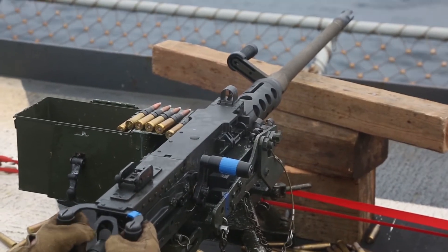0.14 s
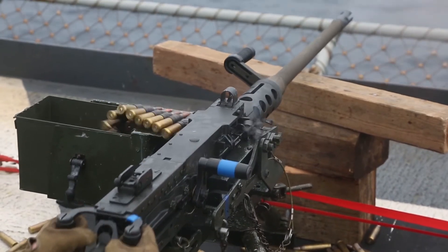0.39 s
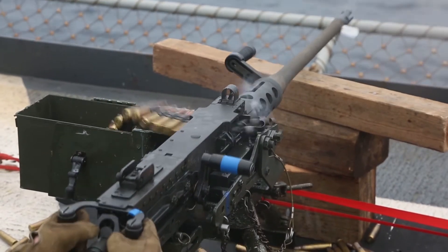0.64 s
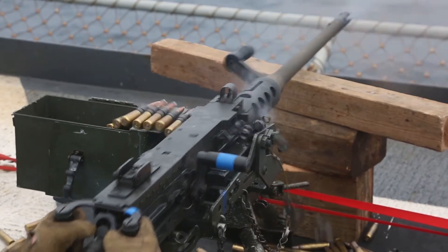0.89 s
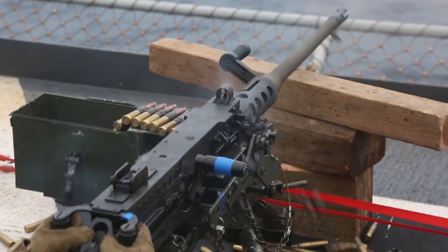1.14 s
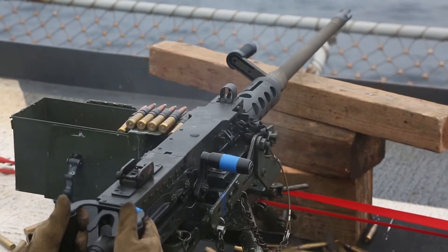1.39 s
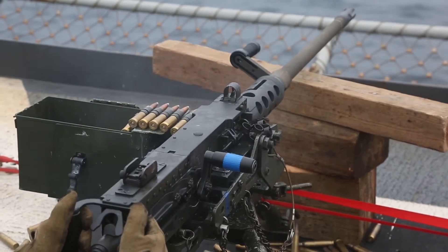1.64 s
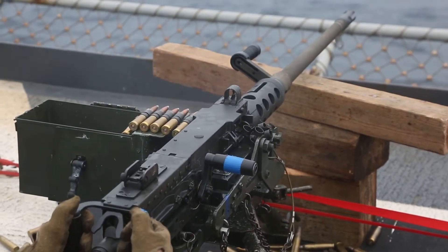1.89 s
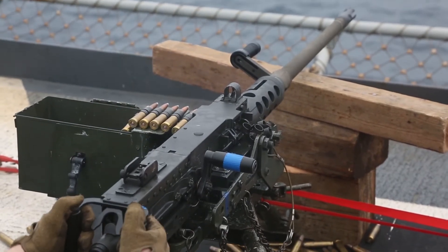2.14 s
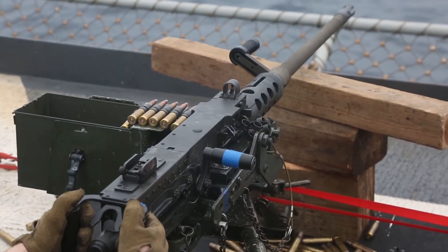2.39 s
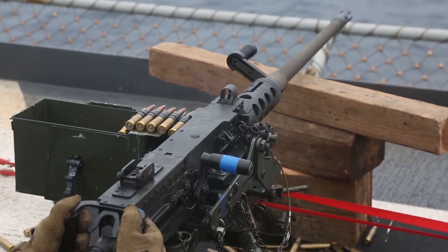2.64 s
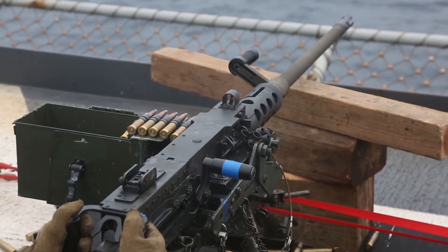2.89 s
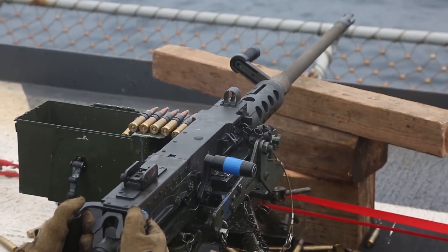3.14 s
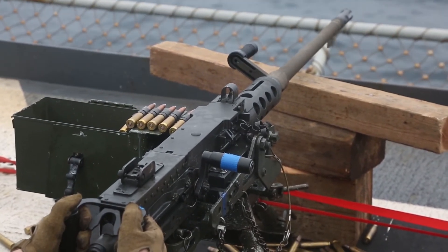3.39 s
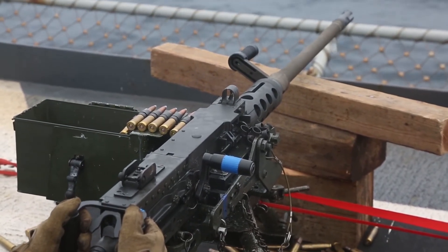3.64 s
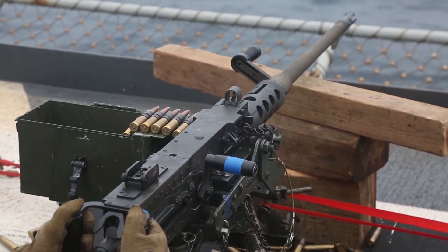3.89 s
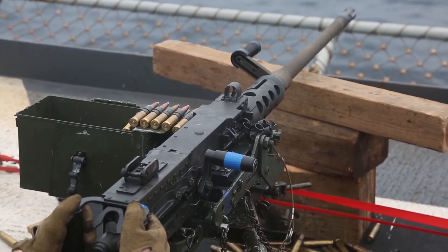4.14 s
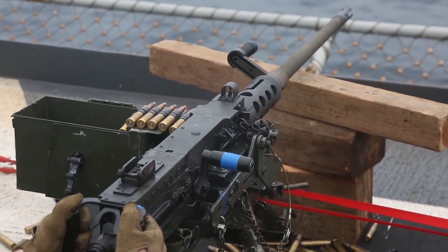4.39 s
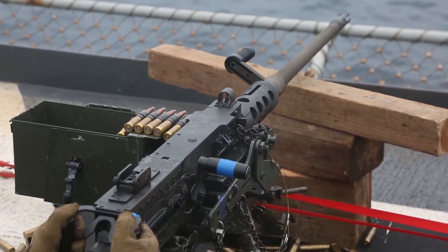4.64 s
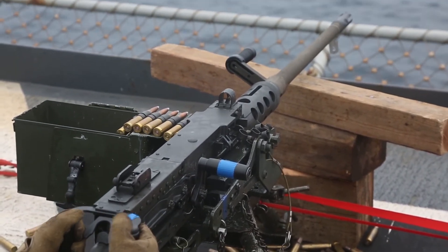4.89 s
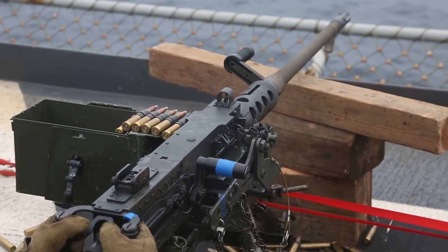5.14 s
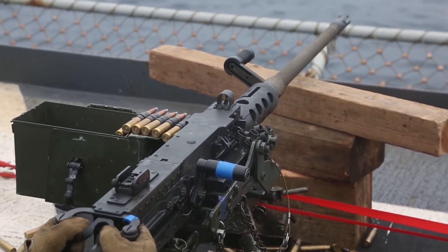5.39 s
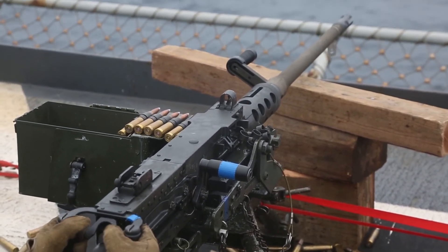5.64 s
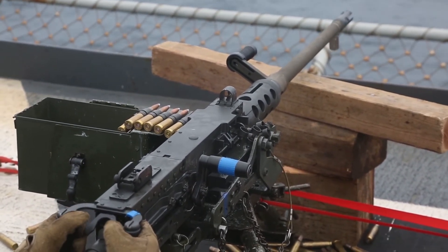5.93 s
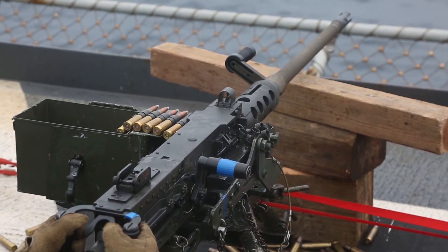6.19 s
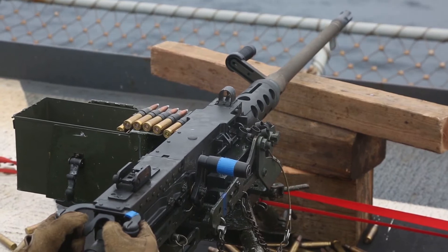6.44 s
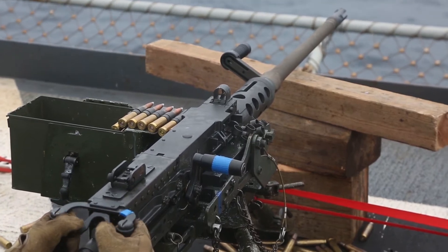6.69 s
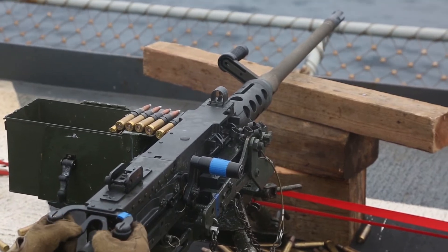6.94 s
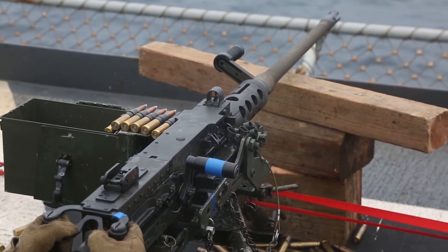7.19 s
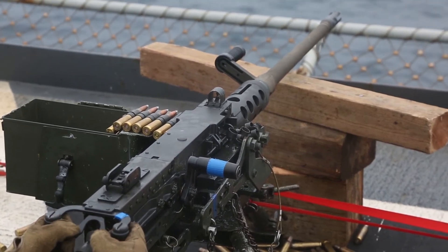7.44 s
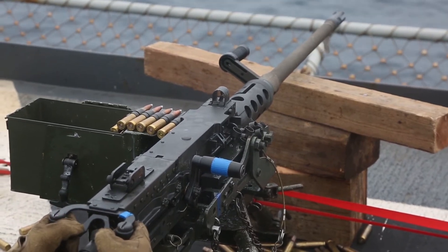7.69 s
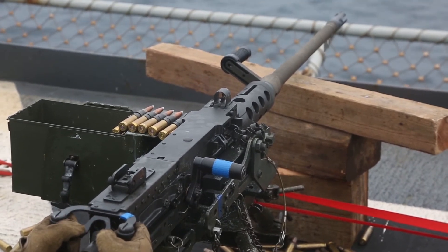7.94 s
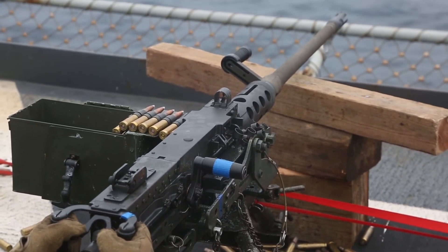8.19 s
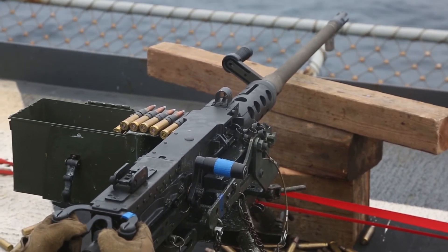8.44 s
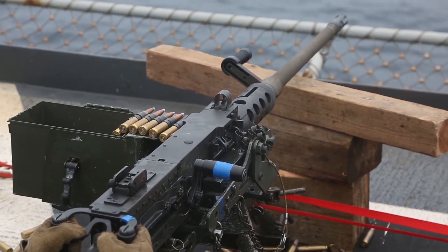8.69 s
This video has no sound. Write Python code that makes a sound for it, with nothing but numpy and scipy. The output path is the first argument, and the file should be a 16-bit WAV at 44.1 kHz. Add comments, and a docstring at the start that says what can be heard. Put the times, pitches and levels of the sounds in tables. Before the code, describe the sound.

A close heavy machine gun hammers a distorted nine-shot burst, brass clinks and echoes roll over water, then a second gun fires a longer burst.

```python
"""Two heavy machine guns on a ship's deck over open water: the near one fires a burst, later a neighbour does.
Each shot is shaped noise: a scattered blast, fresh muzzle gas and a long dull echo that overload the microphone.
Spent cases, bolt, mount and gear ring as dying sines and noise bursts; dull thumps are soft pressure pushes.
Underneath lie ship machinery hum as wavering sines, sea wash as swelling noise bands and lumpy low wind."""
import sys
import numpy as np
from scipy import signal
from scipy.io import wavfile
from scipy.ndimage import uniform_filter1d

SR = 44100
rng = np.random.default_rng(int(sys.argv[2]) if len(sys.argv) > 2 else 0)


def natural_amplitude(level_db):
    """Convert a level in decibels to a linear amplitude factor, elementwise."""
    exponent = np.asarray(level_db, float) / 20
    return 10 ** exponent


def inscribe(sig):
    """Save sig as 16-bit PCM at rate SR to the path in sys.argv[1].

    A 1-D sig is mono; a 2-D sig holds one channel per row.
    Samples are clipped to [-1, 1] before scaling.
    """
    pcm = np.round(np.clip(np.atleast_2d(sig).T, -1, 1) * 32767)
    wavfile.write(sys.argv[1], SR, pcm.astype(np.int16))


N = 388521

# Shots of the near gun; the first three fall before the start, so only their tails are heard.
# Each row: start in seconds, relative strength in dB.
NEAR_SHOTS = [(-0.69, -0.5), (-2.2, -1), (-1.08, 0), (.342, 0.5), (.447, 2), (.551, -2), (.66, -1),
              (.773, -0.5), (.88, -2), (.984, -0.5), (1.092, -0.5), (1.203, 0)]
# Shots of the neighbouring gun. Each row: start in seconds, relative strength in dB.
FAR_SHOTS = [(6.8983, -1.5), (7.0141, -2.5), (7.148, 0.5), (7.2714, 0), (7.404, -3), (7.534, 0),
             (7.6677, -1), (7.7956, -2), (7.9217, -0.5), (8.0504, -0.5), (8.1749, -1.5), (8.3099, 0.5),
             (8.4314, -0.5), (8.5604, 0.5)]
# Blast scattered by deck and ship, per gun.
# Each row: frequency in Hz, relative level in dB, build-up in seconds, 60 dB decay time in seconds.
NEAR_BLAST = [(60, -6, 0.028, 0.44), (170, 4.5, 0.04, 0.72), (348, 9.5, 0.017, 0.52),
              (800, 13, 0.0092, 0.42), (2009, 13, .006, 0.32), (5000, 7.5, 0.0048, 0.39),
              (12000, 14, .003, 0.084)]
FAR_BLAST = [(57, -10.5, 0.0072, 0.5), (150.6, 6, 0.029, .45), (320, 13, 0.0091, 0.37),
             (800, 12, 0.012, 0.35), (2040, 7.5, 0.0021, 0.31), (5000, 7, 0.0013, 0.3),
             (12350, 10, 0.0045, 0.13)]
# Resonances of the space around each gun. Each row: frequency in Hz, width in Hz, boost over the blast in dB.
NEAR_RESONANCES = [(204, 81, 3.5), (300, 12, 4), (371, 38, 5), (476, 25, 3), (624, 12, 2), (716, 110, 4),
                   (877, 41, 0.5), (1340, 48, 4), (2390, 68, 1.5)]
FAR_RESONANCES = [(283, 120, 2.4), (375, 17, 4.3), (402, 13, 2.1), (493, 15, 6.1), (620, 13, 4.3),
                  (702, 14, 2.4), (816, 18, 7.2), (980, 43, 3), (1130, 39, 6), (1580, 44, 4),
                  (1840, 250, 4.5)]
# Echo rolling back from hull and waves. Each row: frequency in Hz, early relative level in dB,
# early 60 dB decay time in seconds, late relative level in dB, late 60 dB decay time in seconds.
ECHO = [(60, -35, 0.9, -50.5, 5.9), (162.3, -19, 1.6, -34.5, 6.5), (400, -16.5, 1.6, -35, 6.2),
        (996, -24.5, 1.5, -26.5, 4.6), (2040, -15, 1.43, -26.5, 3.8), (3300, -25, 1.7, -48.5, 2.9),
        (5500, -24.5, 1.7, -61, 2.4), (12000, -43, 0.65, -84, 1.4)]
# Longest rings of the mount and the pile of brass, set going by the near gun.
# Each row: nominal frequency in Hz, relative level in dB, nominal 60 dB decay time in seconds.
MOUNT_MODES = [(3760, -30, 3.9), (5740, -34, 3.0), (7040, -40.5, 2.3), (7636, -40.5, 1.8), (8048, -48, 2),
               (8790, -37.5, 1.3), (10900, -44, 1.4)]
# Machinery lines. Each row: frequency in Hz, rms level in dB before wavering.
HUM_LINES = [(120, -68), (180, -50.5), (225, -67), (270, -60.5), (285, -63.5), (360, -68), (375, -61.5),
             (585, -63), (600, -72.5), (720, -65.5), (810, -71)]
# Spectrum of the sea wash. Each row: frequency in Hz, relative density in dB per Hz.
WASH_SPECTRUM = [(35, -46), (60, -14.5), (129, -15), (182, -3.5), (324, -13), (381, -5.5), (428, -17.5),
                 (591, -9.5), (938, -15), (4950, -40.5), (15000, -41.5)]
# Wind on the microphone. Each row: time in seconds, level in dB.
GUSTS = [(0, -50), (.32, -45), (3.2, -58), (3.84, -56), (3.9, -46), (4.02, -60), (4.1, -45), (4.3, -53),
         (4.77, -46), (5.02, -70), (5.5, -53), (5.64, -72), (5.99, -72), (6.1, -56), (6.5, -46),
         (6.62, -31), (6.76, -32), (6.82, -38), (6.88, -32), (7.0, -45)]
# Single buffets of wind. Each row: time in seconds, nominal peak level in dB, nominal pitch in Hz.
BUFFETS = [(3.878, -38, 34.8), (4.083, -34, 45), (4.49, -39, 32), (6.17, -41, 35), (6.677, -23, 46)]
# Brass cases striking deck and each other. Each row: start in seconds, relative level in dB,
# pitch of the favoured ring in Hz, share of the free ring time.
CASE_HITS = [(0.0014, -45, 7000, 0.54), (0.0912, -42.5, 6650, 0.44), (1.3703, -15, 6440, 0.16),
             (1.3974, -16.5, 6300, 0.15), (1.4514, -22, 5370, 0.28), (1.5055, -11, 8800, 0.84),
             (1.508, -10.5, 4730, 0.85), (1.84, -25, 4700, 0.82), (1.5948, -18, 10500, 0.97),
             (1.7823, -21, 9000, 0.26), (1.8024, -24, 8800, 0.73), (1.8614, -24.5, 11600, 0.4),
             (1.9071, -24.5, 11500, 0.76), (1.9444, -29, 10900, 0.49), (2.0647, -29, 5130, 0.26),
             (2.2548, -32, 14400, 0.4), (2.8624, -51, 6440, 0.6), (3.1243, -49.5, 6440, 0.41),
             (7.5054, -15, 6410, 0.21)]
# Modes of a free case. Each row: nominal frequency in Hz, relative level in dB, 60 dB decay time in seconds.
CASE_MODES = [(4750, -6, 0.3), (5695, -12, .5), (5920, -10, 0.49), (6200, -15, .5), (6440, -6.5, 0.95),
              (6600, -15.5, .5), (7150, -11, 0.79), (7700, -14.5, 0.84), (8200, -16.5, 0.72),
              (8800, -7, 0.96), (9200, -20, 0.36), (10670, -9.5, .7), (10900, -15, 0.25),
              (11660, -7.5, 0.2), (11800, -13.5, .3), (12100, -17.5, .4), (13090, -12, .5),
              (13810, -10.5, .35), (14200, -13, .3), (14900, -10, .35), (14950, -9, .3)]
# Dull thumps. Each row: start in seconds, nominal peak level in dB, nominal pitch in Hz.
THUMPS = [(0.063, -18, 136), (2.506, -15.5, 189), (2.539, -15.5, 301), (2.587, -23.5, 188),
          (2.722, -23, 143), (2.76, -14.5, 172), (2.791, -20.5, 190), (2.928, -22.5, 185),
          (3.054, -16, 377), (3.09, -16, 149), (3.157, -20, 195)]
# Bolt and links clanking after each shot, per gun.
# Each row: nominal delay after the shot in seconds, level in dB, 60 dB decay time in seconds.
NEAR_BOLT = [(.052, -10, 0.072), (.082, -14.5, 0.18), (.108, -5.5, .07), (.141, -16.5, 0.043)]
FAR_BOLT = [(0.044, -14.5, 0.032), (0.094, -23, 0.026)]
# Links and cases rattling out after each shot, per gun.
# The row: relative level in dB, build-up in seconds, 60 dB decay time in seconds.
NEAR_RATTLE = (-14, 0.037, .6)
FAR_RATTLE = (-15.5, .06, 0.73)
# Dry ticks. Each row: start in seconds, level in dB.
TICKS = [(2.722, -43), (2.805, -42), (2.876, -39.5), (2.952, -47), (2.977, -39), (3.171, -46), (3.293, -49),
         (3.363, -50)]
# Gear being handled. Each row: start in seconds, level in dB, 60 dB decay time in seconds,
# centre in Hz, relative level of the metal ring in dB.
HANDLING = [(3.49, -60, .06, 6000, -30), (4.824, -37.5, .04, 4400, -14), (4.833, -38, 0.15, 600, -7),
            (4.838, -49, 0.12, 7000, -20), (4.86, -38, 0.14, 2600, -8), (4.866, -35.5, 0.13, 553, -30),
            (4.983, -48, 0.089, 5500, -3), (4.996, -42, 0.1, 900, -14), (5.053, -53, 0.087, 5000, -1),
            (5.113, -54.5, .08, 4000, -4), (5.33, -55, .05, 800, -14), (6.477, -51.5, 0.17, 2500, -20),
            (6.49, -51, .12, 5500, -20), (6.52, -51, 0.074, 5000, -12), (6.55, -56, .08, 1810, -15),
            (6.8, -64, .15, 5000, -30)]
# Modes of the handled metal.
# Each row: nominal frequency in Hz, relative level in dB, 60 dB decay time in seconds before damping.
GEAR_MODES = [(610, -3, 0.054), (930, -6, .06), (1240, -11, .06), (1513, -12, .07), (1825, 6, 0.09),
              (2220, 2, 0.039), (3560, -5, 0.054), (2900, -1, .05), (4300, -11, .05), (4770, -14, .06),
              (5300, -12, .08)]
# Faint thin ringing of loose metal. Each row: start in seconds, length in seconds, frequency in Hz, level in dB.
SHIMMER = [(4.905, .07, 9150, -72), (5.19, .1, 9100, -77), (5.651, .08, 9350, -78),
           (5.79, 0.44, 10400, -75), (5.9, 0.37, 9200, -75), (5.94, 0.2, 5550, -76),
           (6.2, 0.092, 9350, -75), (6.518, 0.063, 5820, -64)]


def rms_one(x):
    """Scale to rms 1."""
    return x / np.sqrt(np.mean(x ** 2) + 1e-20)


def at_hz(rows, hz):
    """Columns of a table at one frequency, interpolated along log frequency."""
    known, *columns = np.transpose(rows)
    return [np.interp(np.log(hz), np.log(known), c) for c in columns]


def band(x, low, high, order=2):
    """Butterworth band-pass."""
    sos = signal.butter(order, [low, min(high, SR / 2.2)], "band", fs=SR, output="sos")
    return signal.sosfilt(sos, x)


def drift(rate):
    """Slow random wander: straight lines between rate knots a second, each drawn with spread 1."""
    knots = rng.standard_normal(400)
    return np.interp(np.arange(N) / SR * rate, np.arange(400), knots)


def noise_bands(size):
    """Half-octave bands of white noise with their centres; neighbours come from unrelated noises."""
    white = [rng.standard_normal(size), rng.standard_normal(size)]
    edges = 30 * 2 ** np.arange(0, 9.6, .5)
    pairs = enumerate(zip(edges, edges[1:]))
    return [(np.sqrt(low * high), band(white[k % 2], low, high)) for k, (low, high) in pairs]


def dying(t, t60):
    """Exponential decay, 60 dB in t60, which is held to at least 0.003."""
    return np.exp(-np.log(1000) * t / np.maximum(t60, .003))


def add(out, s, sound):
    """Mix a sound in at time s; what lies outside is lost."""
    at = round(s * SR)
    part = sound[max(-at, 0):N - at]
    out[max(at, 0):max(at, 0) + len(part)] += part


def struck(modes, t, lasting, detune, uneven_db):
    """Rows of dying sines; every piece is tuned and struck a little differently."""
    hz, level_db, t60 = np.transpose(modes)[:, :, None]
    luck = rng.standard_normal((2, len(modes), 1))
    phase = (2 * np.pi * hz * (1 + detune * luck[1]) * t % (2 * np.pi)).astype(np.float32)
    fade = dying(t, t60 * lasting).astype(np.float32)
    return natural_amplitude(level_db + uneven_db * luck[0]) * fade * np.sin(phase)


def push(t, hz, cycles):
    """A soft pressure push of about one cycle."""
    return -np.sin(2 * np.pi * hz * t) * t * hz * dying(t * hz, cycles) * 5.2


def blast(table, resonances):
    """Three nearby replies to a shot: noise bands build up and die at their own pace, then resonate."""
    t, out = np.arange(2 * SR // 3) / SR, 0
    for hz, noise in noise_bands(size=(3, len(t))):
        level_db, rise, t60 = at_hz(table, hz)
        envelope = (1 - np.exp(-t / max(rise, 1e-4))) * dying(t, t60)
        out = out + rms_one(noise) * natural_amplitude(level_db) * envelope
    for hz, width, boost_db in resonances:
        r = np.exp(-np.pi * width / SR)   # pole radius
        zeros = [(1 - r * r) / 2, 0, (r * r - 1) / 2]
        poles = [1, -2 * r * np.cos(2 * np.pi * hz / SR), r * r]
        peak = signal.lfilter(zeros, poles, out)
        out = out + (natural_amplitude(boost_db) - 1) * peak
    return out * (1 - t / t[-1])


def echo():
    """The long roll over the water: each noise band decays in two slopes, the extreme treble lost first."""
    t, out = np.arange(7 * SR // 2) / SR, 0
    for hz, noise in noise_bands(size=len(t)):
        roll_db, roll_t60, late_db, late_t60 = at_hz(ECHO, hz)
        slopes = natural_amplitude(roll_db) * dying(t, roll_t60) + natural_amplitude(late_db) * dying(t, late_t60)
        out = out + rms_one(noise) * slopes
    # distant water sends back a late, brighter swell
    swell = rms_one(band(rng.standard_normal(len(t)), 1100, 3400, order=4))
    out = out + natural_amplitude(-48.5) * swell * np.exp(-((t - 1.35) / 0.62) ** 2)
    return out * (1 - np.exp(-t / 0.15)) * np.minimum(1, 2 * (t[-1] - t))


def gun(shots, replies, roll, change, gas_db, gas_rise, gas_t60, gas_hz):
    """Each shot gets a related reply from the surroundings; the turbulent muzzle gas is new each time."""
    out, t = np.zeros(N), np.arange(SR // 4) / SR
    mix = change * rng.standard_normal((len(shots), 2))
    gas_envelope = (1 - np.exp(-t / gas_rise)) ** 2 * dying(t, gas_t60)
    for (s, strength_db), (a, b) in zip(shots, mix):
        reply = (replies[0] + a * replies[1] + b * replies[2]) / np.sqrt(1 + a * a + b * b)
        gas = rms_one(band(rng.standard_normal(len(t)), 1200, gas_hz, order=1))
        add(out, s, natural_amplitude(strength_db) * reply)
        add(out, s, natural_amplitude(strength_db) * roll)
        add(out, s, natural_amplitude(strength_db + gas_db) * gas * gas_envelope)
    return out


def mount():
    """Recoil of one shot before the start and of the last near shot leaves long thin rings that swell slowly."""
    out, t = np.zeros(N), np.arange(2 * SR) / SR
    for (s, _), level_db in ((NEAR_SHOTS[2], -8), (NEAR_SHOTS[-1], 0)):
        rings = np.sum(struck(MOUNT_MODES, t, 0.98, .0004, 0.99), axis=0)
        add(out, s, natural_amplitude(level_db) * rings * (1 - np.exp(-t / 0.39)) * (1 - t / 2))
    return out


def machinery():
    """Steady sine lines that waver a little in level."""
    t, out = np.arange(N) / SR, np.zeros(N)
    for hz, level_db in HUM_LINES:
        line = np.sin(2 * np.pi * (hz * t + rng.random()))
        out += np.sqrt(2) * natural_amplitude(level_db) * (1 + 0.23 * drift(11.0)) * line
    return out


def wash():
    """Sea and ship noise, each band swelling on its own."""
    out = np.zeros(N)
    for hz, noise in noise_bands(size=N):
        if hz > 100:
            out += noise * natural_amplitude(at_hz(WASH_SPECTRUM, hz)[0]) * (1 + .15 * drift(3.9))
    return natural_amplitude(-53.5) * rms_one(out)


def wind():
    """Lumpy rumble from air over the microphone, brighter as it blows harder, with single buffets."""
    gust_s, gust_db = np.transpose(GUSTS)
    level_db = np.interp(np.arange(N) / SR, gust_s, gust_db)
    low = band(rng.standard_normal(N), 11, 50)
    high = band(rng.standard_normal(N), 50, 150)
    lumps = low + natural_amplitude(-10.5 + .15 * (level_db + 45.5)) * high
    # level the lumps so that the gusts alone set the loudness
    out = natural_amplitude(level_db) * lumps / np.sqrt(uniform_filter1d(lumps ** 2, size=6000))
    t = np.arange(SR // 6) / SR
    for s, peak_db, hz in BUFFETS:
        add(out, s - .15 / hz, -natural_amplitude(peak_db) * push(t, hz, cycles=3.1))
    return out


def brass():
    """Each touch rings the modes of two cases, so the lines beat; many small touches fill in."""
    out, t = np.zeros(N), np.arange(SR // 4) / SR
    hz = np.transpose(CASE_MODES)[:1].T
    tick = band(np.r_[1, np.zeros(200)], 3000, 15000)
    for s, level_db, centre, lasting in CASE_HITS:
        near_centre = natural_amplitude(-24 * np.abs(np.log2(hz / centre)))   # 24 dB down per octave away
        pair = struck(CASE_MODES, t, lasting, .003, 3.1) + 1.1 * struck(CASE_MODES, t, lasting, 0.011, 2.8)
        add(out, s, natural_amplitude(level_db - 7.0) * np.sum(near_centre * pair, axis=0) * (1 - 4 * t))
        add(out, s, natural_amplitude(level_db - 10.5) * tick)
    # jostling cases after the near burst: they fade, and faster once they settle
    start_s, end_s, settle_s = 1.2, 2.35, 1.94
    fade_db_per_s, settle_db_per_s = 25, 47
    short = t[:SR // 8]
    for s in np.linspace(start_s, end_s, 90) + rng.uniform(-.012, .012, 90):
        rings = np.sum(struck(CASE_MODES[1:], short, .7, 0.013, 7.0), axis=0)
        touch = rings * np.sin(np.pi * (8 * short) ** .3)
        faded_db = fade_db_per_s * (s - start_s) + settle_db_per_s * max(s - settle_s, 0)
        add(out, s, natural_amplitude(-26.5 - faded_db) * touch)
    return out


def thumps():
    """A soft push with a noisy edge on top, crisper for higher thumps."""
    out, t = np.zeros(N), np.arange(SR // 20) / SR
    for s, peak_db, hz in THUMPS:
        edge = band(rng.standard_normal(len(t)) * dying(t, 0.044), 270, 920, order=3) * 6
        edge_db = -12 + 2 * np.log2(hz / 190)   # 2 dB more per octave
        add(out, s, natural_amplitude(peak_db) * (push(t, hz, cycles=2.87) + natural_amplitude(edge_db) * edge))
    return out


def bolt(shots, clanks, top_hz):
    """Steel on steel: a broad clank, new each time, a little early or late."""
    out, t = np.zeros(N), np.arange(SR // 10) / SR
    for s, _ in shots:
        noise = rng.standard_normal((len(clanks), len(t)))
        steel = rms_one(band(noise, 700, top_hz, order=1))
        for (after, level_db, t60), clank in zip(clanks, steel):
            late = .0015 * rng.standard_normal()
            add(out, s + after + late, natural_amplitude(level_db) * dying(t, t60) * clank)
    return out


def rattle(shots, level_db, rise, t60):
    """Dense bright clatter of uneven noise grains that swells between the shots."""
    out, t = np.zeros(N), np.arange(SR // 3) / SR
    envelope = (1 - np.exp(-t / rise)) * dying(t, t60) * (1 - 3 * t)
    for s, _ in shots:
        grains = rng.standard_normal(len(t)) * natural_amplitude(3.5 * rng.exponential(1, len(t)))
        add(out, s, natural_amplitude(level_db) * rms_one(band(grains, 3500, 15000, order=1)) * envelope)
    return out


def handling():
    """Dry ticks and short grainy rustles about a centre pitch, ringing the metal more or less."""
    out, t = np.zeros(N), np.arange(SR // 7) / SR
    ticks = [(s, level_db, .08, 2000, -12) for s, level_db in TICKS]   # columns as in HANDLING
    for s, level_db, t60, centre_hz, metal_db in ticks + HANDLING:
        grains = rng.standard_normal(len(t)) * natural_amplitude(1.8 * rng.exponential(1, len(t)))
        rustle = band(grains, centre_hz / 11.0, centre_hz * 1.6)
        rustle = rms_one(band(rustle, 260, centre_hz * 2.04)) * dying(t, t60)
        rings = np.sum(struck(GEAR_MODES, t, 0.64, 0.021, 4.7), axis=0)
        metal = signal.fftconvolve(grains * dying(t, t60), rings)[:len(t)]
        metal = natural_amplitude(metal_db + 8.5) * metal / np.abs(metal).max()
        add(out, s, natural_amplitude(level_db) * (rustle + metal))
    return out


def squeak():
    """A slipping contact: pitch and level climb together while the friction stutters, then it stops."""
    start_s, length_s = 4.65, .078
    start_hz, rise_hz_per_s = 2500, 38000
    end_db, swell_db = -61, 20
    out, t = np.zeros(N), np.arange(round(length_s * SR)) / SR
    phase = 2 * np.pi * np.cumsum(start_hz + rise_hz_per_s * t) / SR
    slip = rms_one(band(rng.standard_normal(SR), 25.2, 90))[-len(t):]
    level = natural_amplitude(end_db - swell_db * (1 - t / t[-1]))
    add(out, start_s, level * slip * (np.sin(phase) + .2 * np.sin(2 * phase)))
    return out


def shimmer():
    """Narrow noise lines that swell, waver and fade."""
    out = np.zeros(N)
    for s, length, hz, level_db in SHIMMER:
        t = np.arange(round(length * SR)) / SR
        waver = rms_one(band(rng.standard_normal(len(t)), hz - 25, hz + 25))
        add(out, s, natural_amplitude(level_db) * waver * np.sin(np.pi * (t / length) ** 0.57))
    return out


def scene():
    """Mix guns, metal, thumps, hum, wash and wind alike into both channels."""
    roll = natural_amplitude(8) * echo()   # both guns share one echo
    near = gun(NEAR_SHOTS, blast(NEAR_BLAST, NEAR_RESONANCES), roll, change=0.38,
               gas_db=23, gas_rise=0.0041, gas_t60=0.079, gas_hz=13000)
    far = gun(FAR_SHOTS, blast(FAR_BLAST, FAR_RESONANCES), roll, change=0.83,
              gas_db=16.5, gas_rise=0.0012, gas_t60=0.1, gas_hz=7000)
    heard_shots = NEAR_SHOTS[3:]
    steel = bolt(heard_shots, NEAR_BOLT, top_hz=10000) + bolt(FAR_SHOTS, FAR_BOLT, top_hz=5000)
    steel = steel + rattle(heard_shots, *NEAR_RATTLE) + rattle(FAR_SHOTS, *FAR_RATTLE)
    steel = steel + mount() + brass() + handling() + squeak() + shimmer()
    alike = natural_amplitude(-14.0) * (near + far) + steel + thumps() + machinery() + wash() + wind()
    return np.array([alike, alike])


def band_limit(x):
    """A steep low-pass at the top of the band."""
    return signal.sosfilt(signal.butter(12, 16010, fs=SR, output="sos"), x)


def record(dry):
    """The input stage clips hard, earlier on the negative side; faint hiss is opposite per channel; the top is cut."""
    limit, knee = np.where(dry[0] > 0, .59, .55), 5.0
    clipped = dry / (1 + np.abs(dry[0] / limit) ** knee) ** (1 / knee)
    hiss = rms_one(band(rng.standard_normal(N), 2500, 7500))
    hiss = natural_amplitude(-80.0) * hiss * np.array([[1], [-1]])
    top_cut = signal.cheby2(12, 50, 15500, fs=SR, output="sos")
    mix = signal.sosfilt(top_cut, clipped + hiss)
    return band_limit(np.clip(mix, -1, 1))


dry = scene()
out = record(dry)
inscribe(out)
```